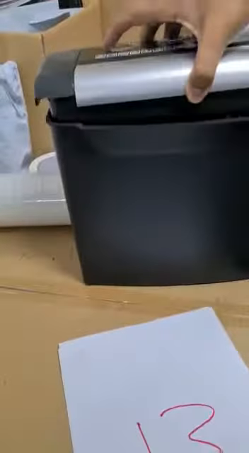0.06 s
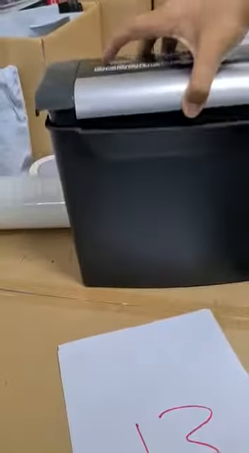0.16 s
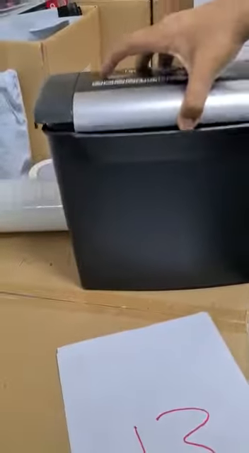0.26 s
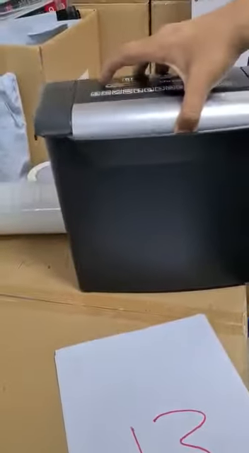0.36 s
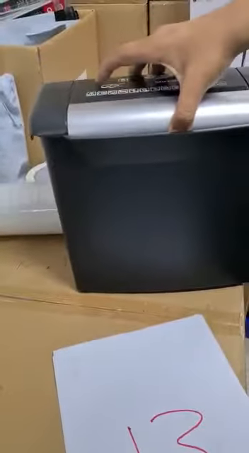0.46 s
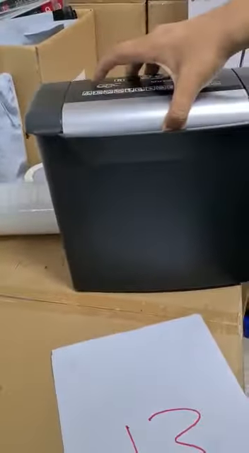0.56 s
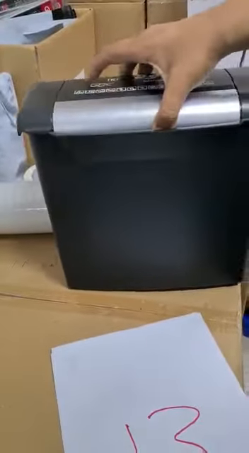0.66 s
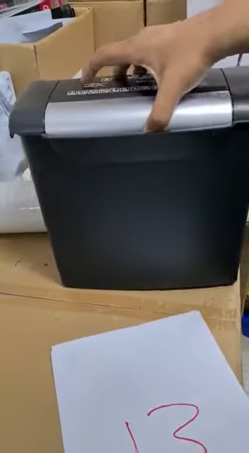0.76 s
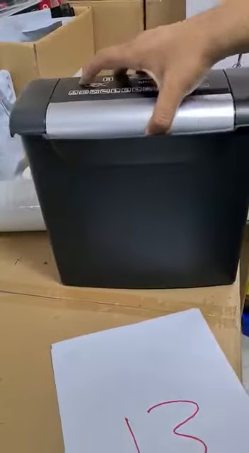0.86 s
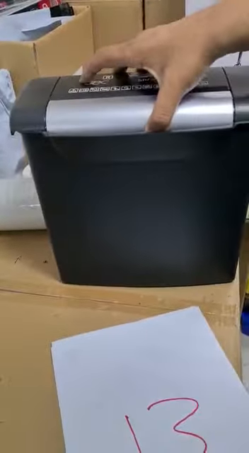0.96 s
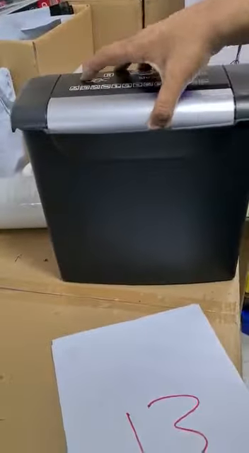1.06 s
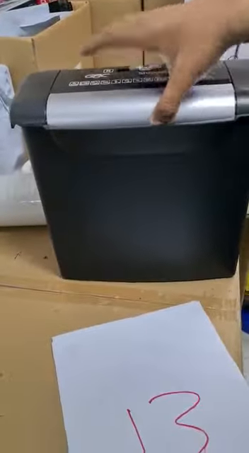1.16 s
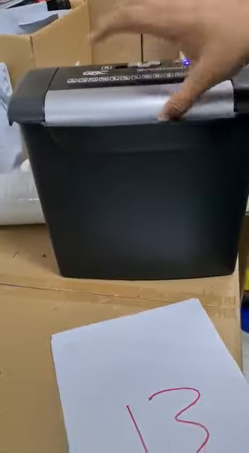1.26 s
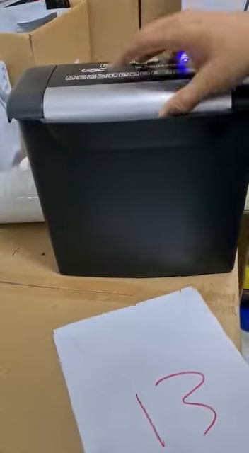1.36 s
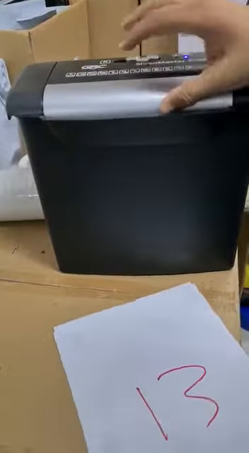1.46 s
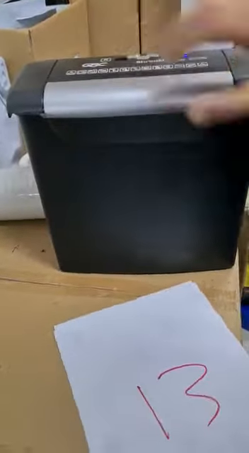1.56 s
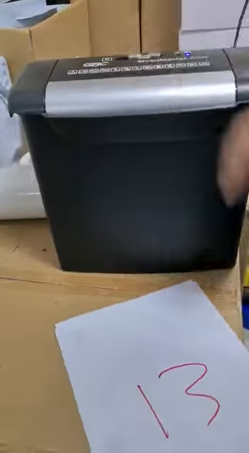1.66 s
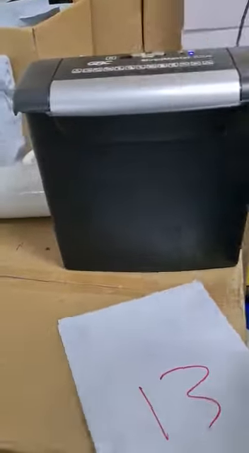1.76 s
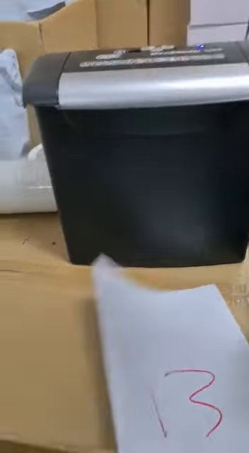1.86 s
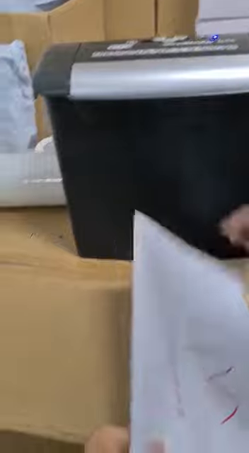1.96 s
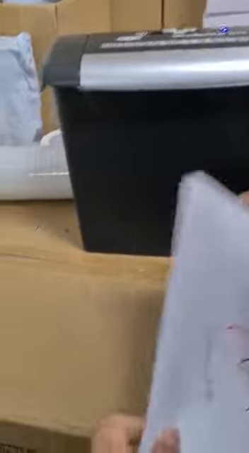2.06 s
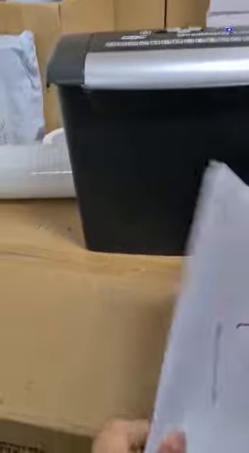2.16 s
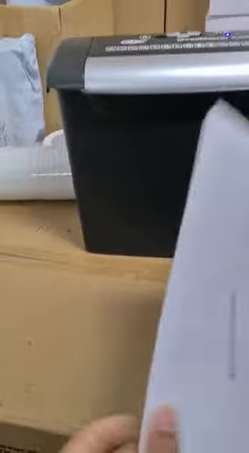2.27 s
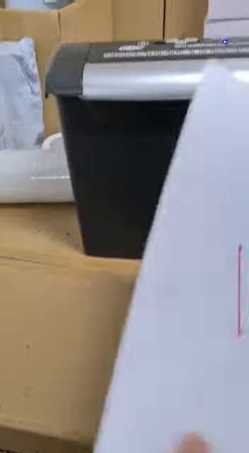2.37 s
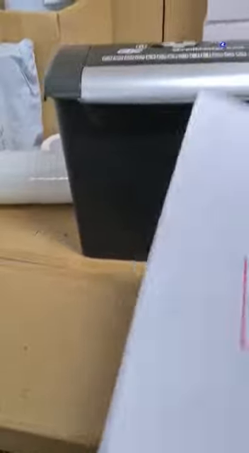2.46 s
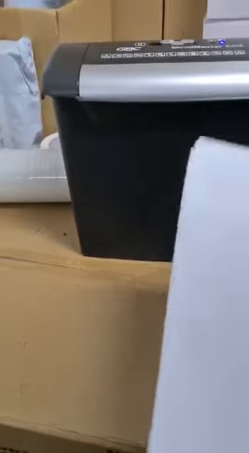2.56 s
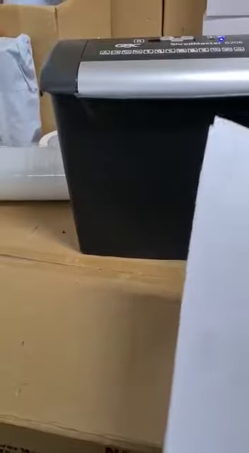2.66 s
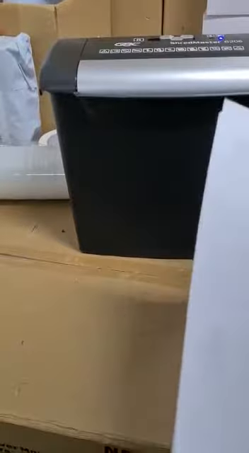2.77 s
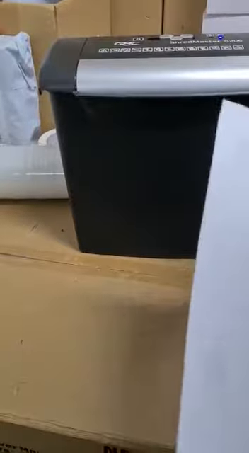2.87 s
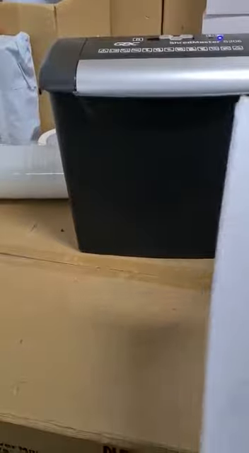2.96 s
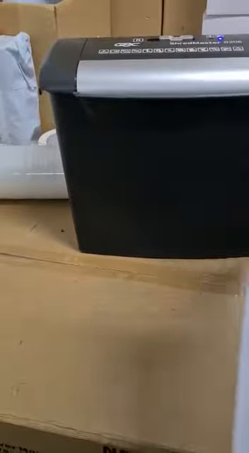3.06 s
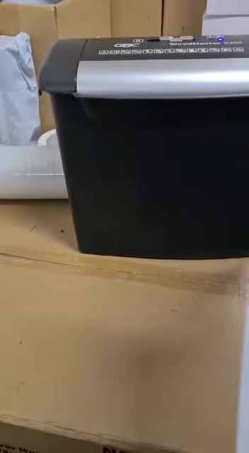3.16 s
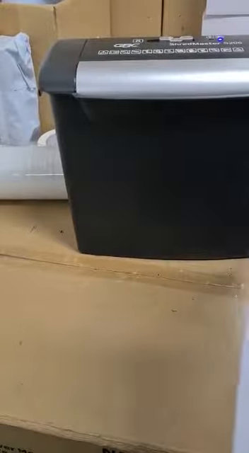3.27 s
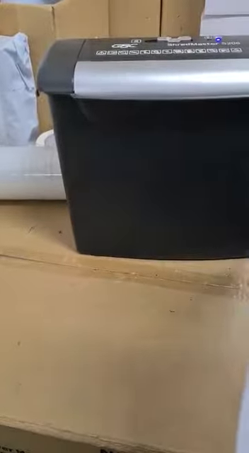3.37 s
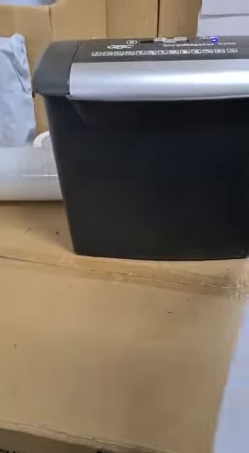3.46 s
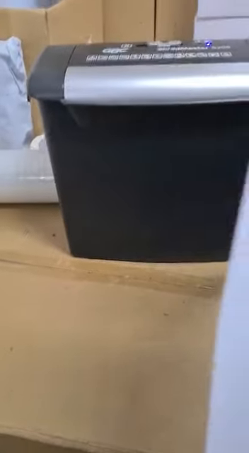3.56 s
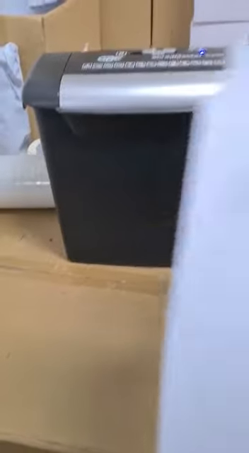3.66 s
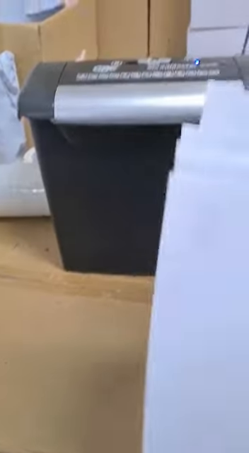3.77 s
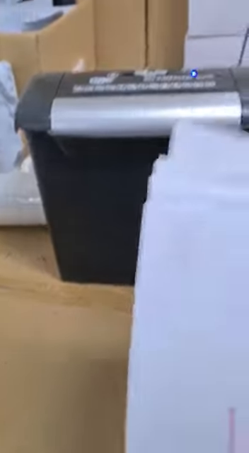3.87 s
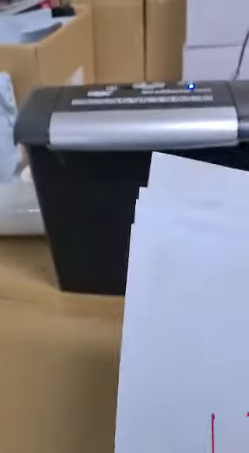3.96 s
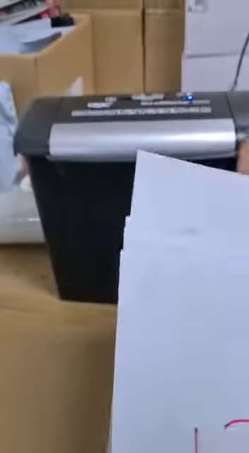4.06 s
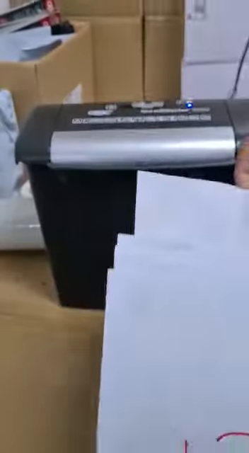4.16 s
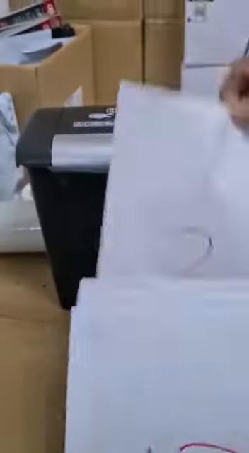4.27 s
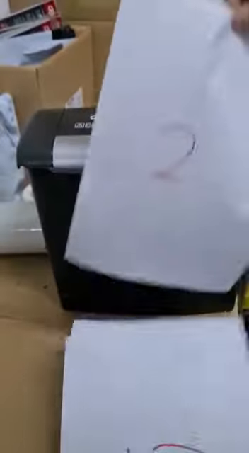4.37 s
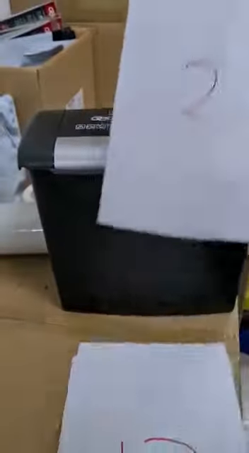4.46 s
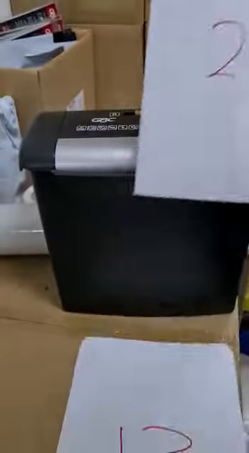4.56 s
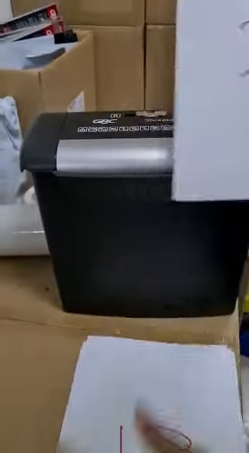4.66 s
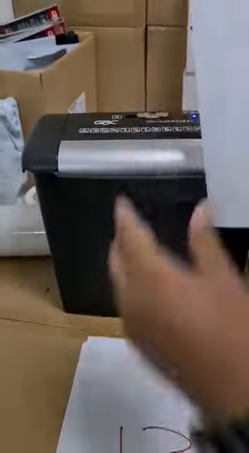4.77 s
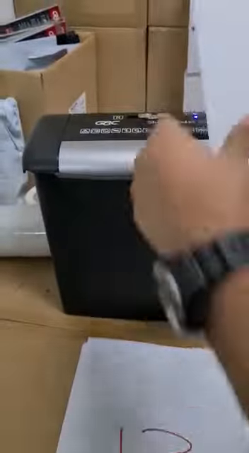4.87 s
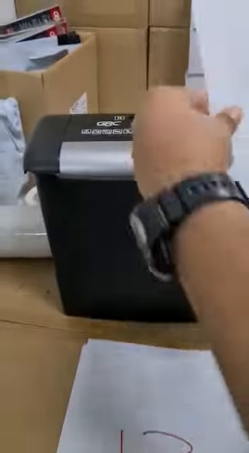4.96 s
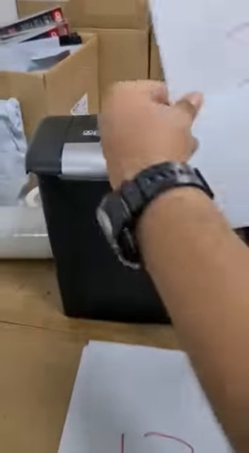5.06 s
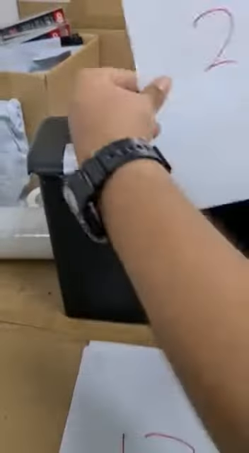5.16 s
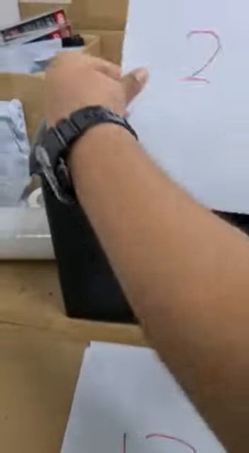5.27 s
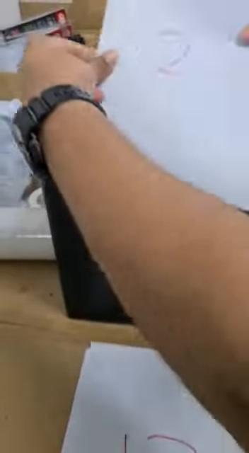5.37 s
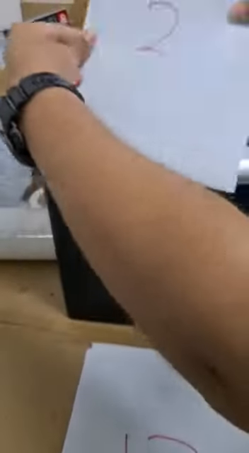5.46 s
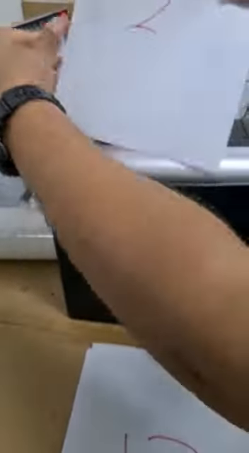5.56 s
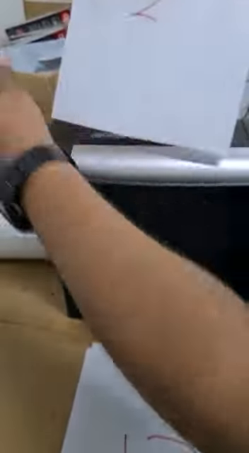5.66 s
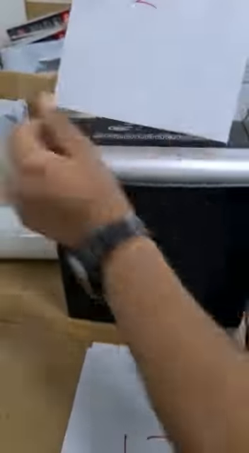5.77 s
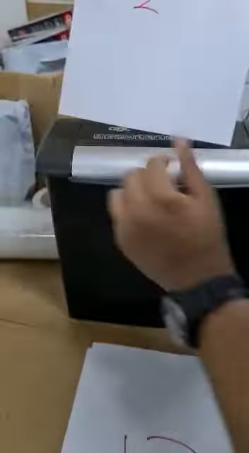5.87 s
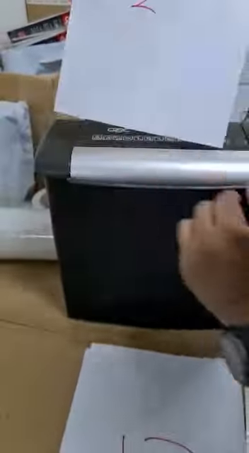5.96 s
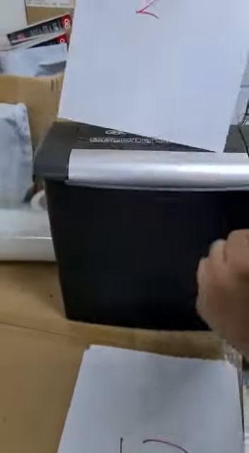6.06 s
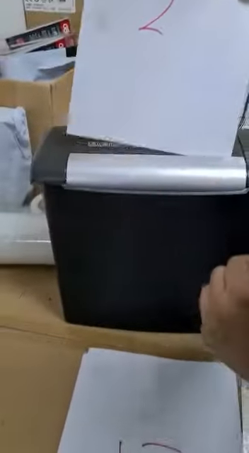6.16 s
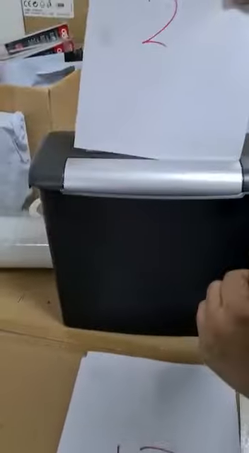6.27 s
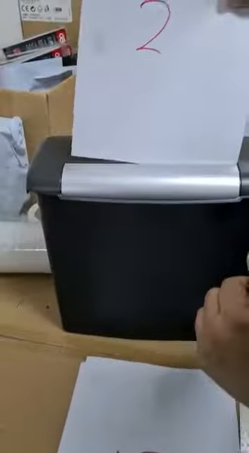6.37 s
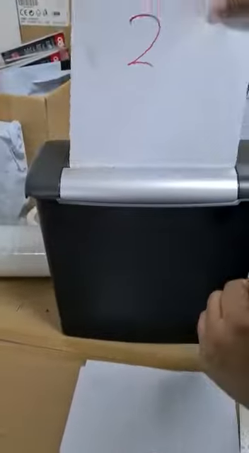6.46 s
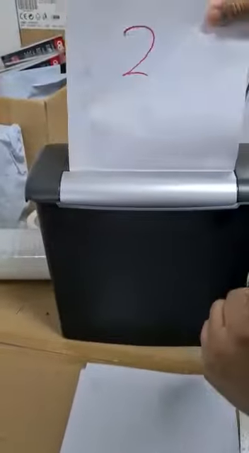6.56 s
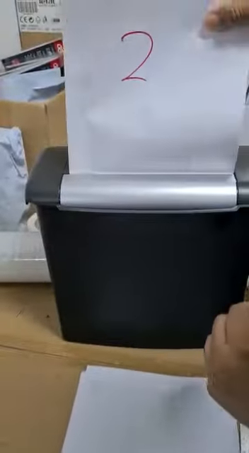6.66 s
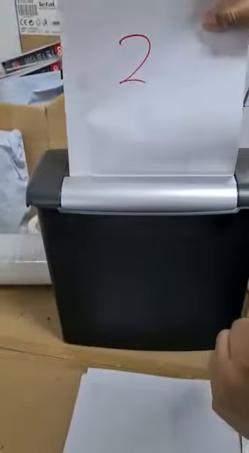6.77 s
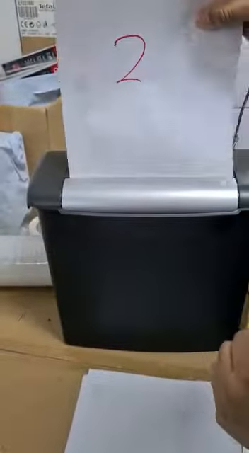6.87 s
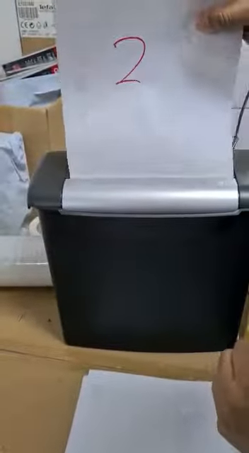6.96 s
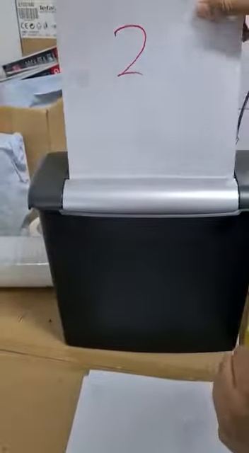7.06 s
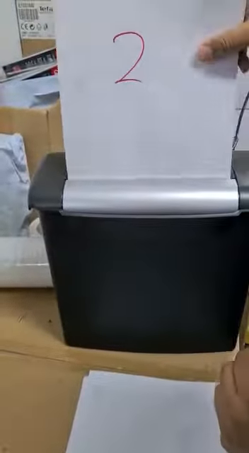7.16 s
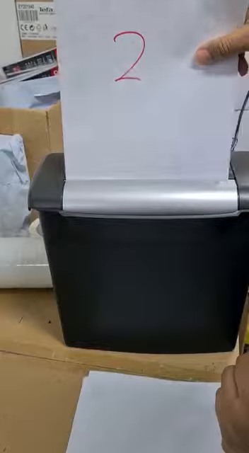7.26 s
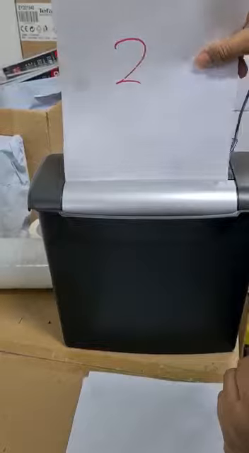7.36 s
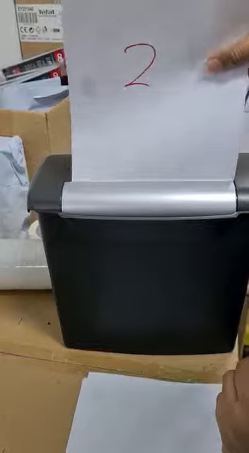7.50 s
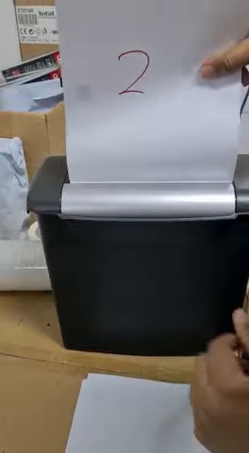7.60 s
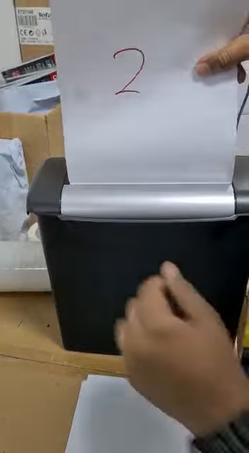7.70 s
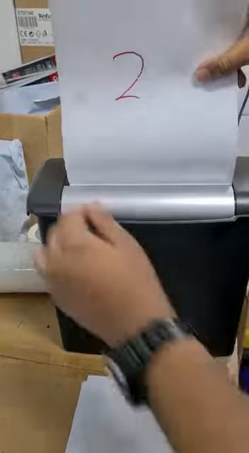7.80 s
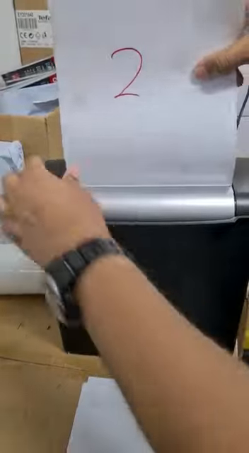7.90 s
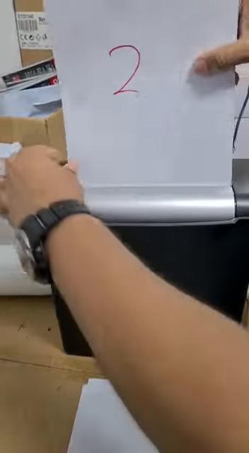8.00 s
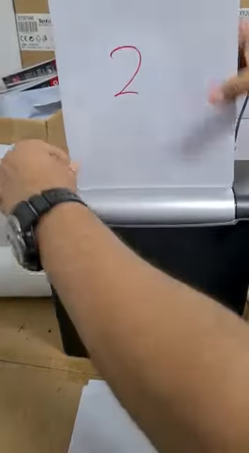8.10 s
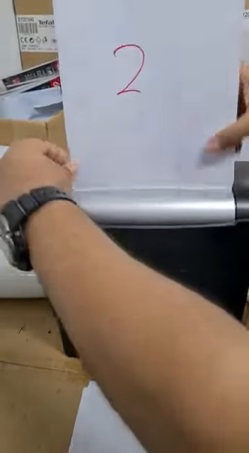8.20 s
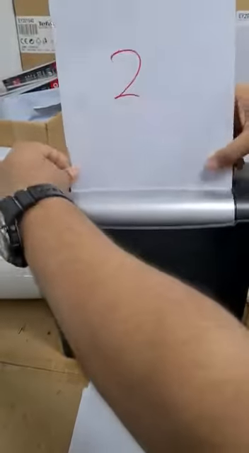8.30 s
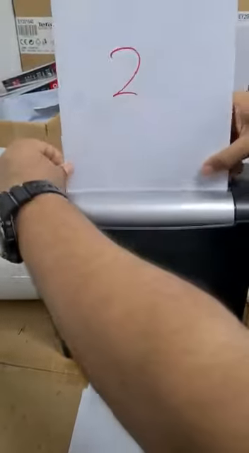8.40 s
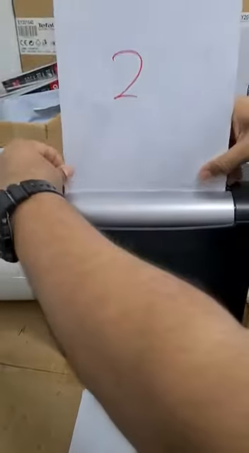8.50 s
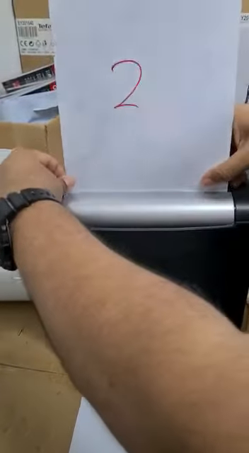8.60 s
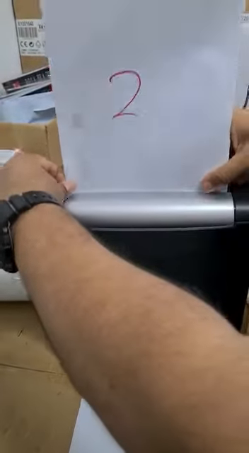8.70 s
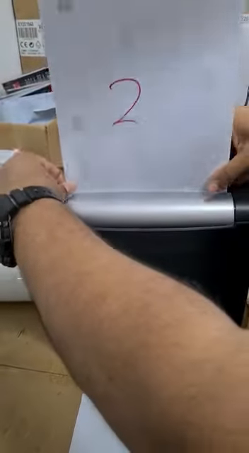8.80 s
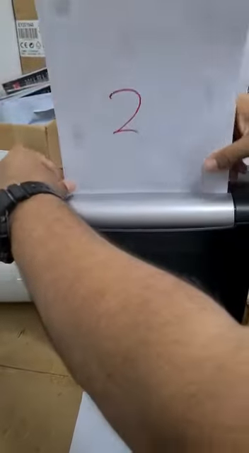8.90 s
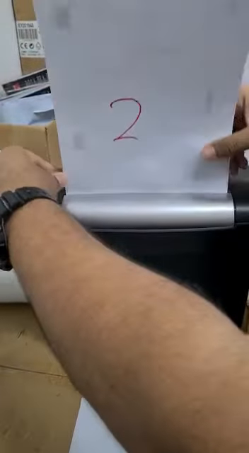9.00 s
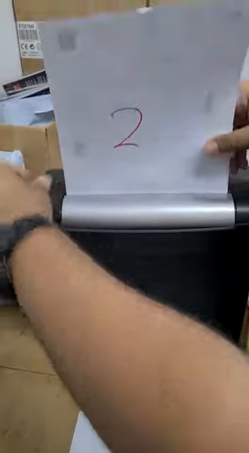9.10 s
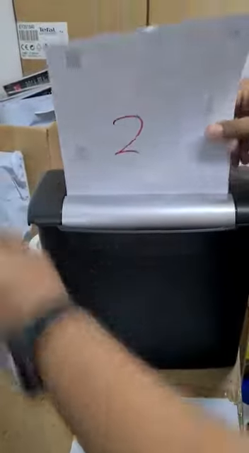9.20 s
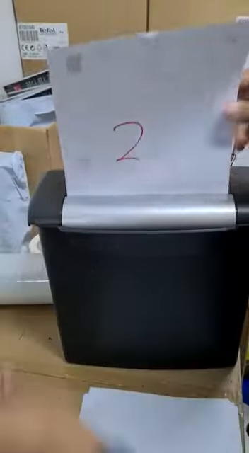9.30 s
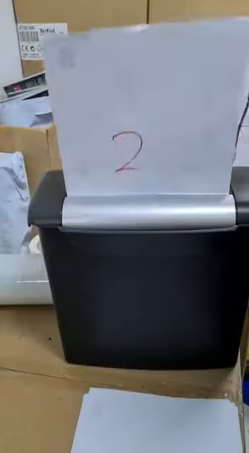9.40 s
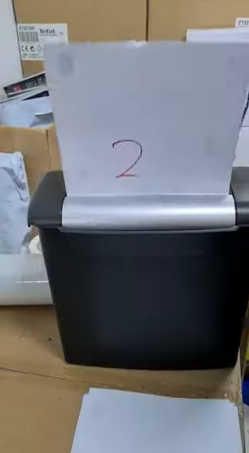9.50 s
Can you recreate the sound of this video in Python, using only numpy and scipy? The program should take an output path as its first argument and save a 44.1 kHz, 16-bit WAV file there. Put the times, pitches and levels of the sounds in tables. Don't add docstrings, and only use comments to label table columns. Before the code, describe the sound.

A plastic lid thumps onto a bin, paper slides and flaps, then a small shredder motor whines in short bursts before running on.

```python
import sys
import numpy as np
from scipy import signal
from scipy.fft import rfft, irfft, next_fast_len
from scipy.io import wavfile
from scipy.ndimage import uniform_filter1d

SR = 44100
rng = np.random.default_rng(int(sys.argv[2]) if len(sys.argv) > 2 else 0)


def to_wav(sig):
    pcm = np.clip(np.atleast_2d(sig), -1, 1) * 32767
    pcm = np.round(pcm).astype(np.int16)
    wavfile.write(sys.argv[1], SR, pcm.T)


def ratio(d):
    e = np.asarray(d, float) / 20
    return 10 ** e


N = 420713


def evened(x):
    return x / np.sqrt(np.mean(x ** 2) + 1e-20)


def read(points, hz):
    f, value = np.transpose(points)
    return np.interp(np.log(hz + 1), np.log(f + 1), value)


def wander(count, seconds, step=1 / SR, length=N):
    knots = rng.standard_normal((count, int(length * step / seconds) + 3))
    at = np.arange(length) * step / seconds
    return np.array([np.interp(at, np.arange(len(k)), k) for k in knots]) * 1.59


def coloured(x, db_at):
    size = next_fast_len(x.shape[-1])
    gain = ratio(db_at(np.fft.rfftfreq(size, 1 / SR)))
    return irfft(rfft(x, size) * gain, size)[..., :x.shape[-1]]


def hump(noise, hz, db_per_octave):
    return evened(coloured(noise, lambda f: -db_per_octave * abs(np.log2((f + 1) / hz))))


# freq_hz, likeness (1 = same, negative = opposed)
LIKENESS = [(60, 0.96), (180, 0.97), (550, 0.43), (1650, -0.28), (4970, 0.61), (15000, 0.2)]


def right_of(left, stranger, hz, least):
    same = np.clip(read(LIKENESS, hz), least, 1)[:, None]
    return same * left + np.sqrt(1 - same ** 2) * stranger


def patchy(noise, bins, frames):
    return evened(uniform_filter1d(uniform_filter1d(noise, bins, 0), frames, 1))


def hiss(points, patchy_db, grit_db, per_s):
    hz = np.fft.rfftfreq(512, 1 / SR)
    tick_db = grit_db * np.minimum(rng.exponential(1, N), 3.8)
    ticks = ratio(tick_db) * (rng.random(N) < per_s / SR)
    bed = np.sqrt(1 + evened(ticks) ** 2) * rng.standard_normal((2, N))
    z = signal.stft(bed, nperseg=512, noverlap=384)[2]
    z[1] = right_of(z[0], z[1], hz, least=.35)
    patches = patchy(rng.standard_normal(z.shape[1:]), 8, 16)
    z = z * ratio(read(points, hz)[:, None] + patchy_db * patches)
    return evened(signal.istft(z, nperseg=512, noverlap=384)[1][:, :N])


# freq_hz, t60_s
ROOM_DECAY = [(200, 0.3), (1000, 0.17), (4000, 0.04), (12000, 0.017)]


def placed(x, pan_db, lag_s, wet_db):
    taps = np.zeros((2, SR // 2))
    at = np.arange(40, SR // 2 - 20, 20) + rng.integers(0, 20, (2, (SR // 2 - 41) // 20))
    np.put_along_axis(taps, at, rng.choice([-1., 1.], at.shape), 1)
    hz, t, z = signal.stft(taps, SR, nperseg=256)
    z[1] = right_of(z[0], z[1], hz, least=0)
    t60 = read(ROOM_DECAY, hz)[:, None]
    tail = signal.istft(z * ratio(-60 * t / t60) / np.sqrt(t60), SR, nperseg=256)[1]
    tail *= ratio(wet_db) / np.linalg.norm(tail[0])
    tail[:, :32] += np.sinc(np.arange(32) - 12 - np.array([[-.5], [.5]]) * lag_s * SR)
    x = np.broadcast_to(x, (2, N)) * ratio(np.array([[.5], [-.5]]) * pan_db)
    return signal.fftconvolve(x, tail, axes=1)[:, 12:N + 12]


def strikes(rows, make, leaning=False):
    out, t = np.zeros((2, N + 12000)), np.arange(12000) / SR
    for row in rows:
        sound = make(t, rng.standard_normal(len(t)), *row[1:])
        at = round(row[0] * SR)
        level_db = row[1] + np.array([[.5], [-.5]]) * row[-1] * leaning
        out[:, at:at + len(t)] += ratio(level_db) * sound / abs(sound).max()
    return out[:, :N]


# freq_hz, level_db (per Hz)
RUMBLE = [(12, -60), (20, -16), (77, 1), (110, -14), (182, -9.5), (310, -19), (422, -22), (472, -22),
          (542, -24.5), (780, -20.5), (849, -22.5), (1370, -29), (1570, -26.5), (2020, -30), (16000, -83)]


def room_tone():
    level_db = -49.5
    hz = np.fft.rfftfreq(2048, 1 / SR)
    a, b, c, d, patches = rng.standard_normal((N // 512 + 5, 1025, 5)).T
    left = a + 1j * b
    z = np.array([left, right_of(left, c + 1j * d, hz, least=-1)])
    z *= ratio(read(RUMBLE, hz)[:, None] + 1.23 * patchy(patches, 10, 6))
    rumble = evened(signal.istft(z, nperseg=2048, noverlap=1536)[1][:, :N])
    return ratio(level_db + np.array([[-.8], [.8]])) * rumble


# start_s, peak_db, ring_hz, t60_s
THUMPS = [(0.0, -24, 193, .05), (0.014, -23, 192, .22), (0.165, -36, 266, 0.051), (0.275, -38, 144, .05),
          (0.334, -30, 228, .035), (0.352, -47, 246, .04), (0.445, -37, 165, 0.055),
          (0.749, -37, 203, 0.074), (1.188, -28.5, 163, 0.052), (1.442, -39.5, 176, 0.051),
          (1.476, -39.5, 284, 0.055), (2.135, -37, 105, .06), (2.184, -31.5, 280, 0.037),
          (2.411, -36.5, 129, 0.046), (2.474, -28, 302, 0.043), (4.412, -36, 195, 0.036),
          (5.353, -35, 142, 0.054), (6.494, -28, 110, 0.038), (6.505, -27, 202, 0.15),
          (7.579, -23.5, 206, .08), (8.307, -23, 164, 0.055), (8.494, -27.5, 217, 0.08)]


def thump(t, noise, db, hz, t60):
    ring = np.sin(2 * np.pi * hz * t) + 0.13 * np.sin(2 * np.pi * 0.93 * hz * t + noise[0])
    push = 0.22 * hump(noise, hz, 9.8)
    return (ring + push) * ratio(-60 * t / max(t60, .02)) * np.minimum(t / 0.0022, 1)


# start_s, peak_db,
# centre_hz, top_db (top end over hump)
MORE_SNAPS = [
    (0.0, -42, 3000, 3),
    (2.4753, -36, 3050, -15),
    (7.5782, -20, 4250, -22),
    (8.5034, -35.5, 4250, -20),
    (4.1237, -35, 4500, -4),
    (4.9408, -37, 4000, -12),
    (5.3593, -36, 4500, -6),
         (0.015, -32, 2050, -27), (1.7843, -29.5, 6200, -3), (2.14, -33.5, 4360, -18),
           (2.1654, -33, 3000, -18), (4.0573, -36.5, 2400, -14), (4.0932, -36, 5500, -7),
           (4.2345, -40, 4200, -20), (4.2693, -32, 1800, -19), (4.3483, -32, 2500, -22),
           (4.3726, -28, 2180, -27), (4.417, -34, 1500, -18), (4.4404, -37, 1730, -19),
           (4.469, -23, 1680, -30), (5.004, -31, 3500, -33), (5.3166, -32, 2040, -28),
           (5.3648, -31, 2500, -25), (5.4088, -33.5, 5500, -6)]
# start_s, peak_db, centre_hz, top_db
SNAPS = [(0.124, -55, 5500, -40), (0.148, -36.5, 4500, -48), (1.6599, -36, 2030, -4),
         (1.7791, -26.5, 1990, -8), (2.139, -39, 1900, -31), (2.1655, -36, 1840, -18),
         (2.4124, -38, 5980, 11), (2.4754, -28.5, 2330, -26), (2.612, -39.5, 3600, -38),
         (3.1726, -49, 2710, -9), (3.1971, -42, 2930, -7), (3.8217, -38, 4070, -44),
         (4.123, -28.5, 1880, -2), (4.213, -25, 1900, -33), (4.301, -23.5, 1690, -15),
         (4.424, -36, 1800, -26), (4.4548, -23.5, 1800, -48), (4.494, -23, 2410, -41),
         (4.9414, -32, 3370, -30), (4.9662, -23.5, 1770, -50), (5.235, -36, 2950, -5),
         (5.3576, -30, 1930, -4), (5.4447, -36, 1850, -12), (5.5094, -37.5, 2960, -28)]
# start_s, peak_db, centre_hz, top_db
CLICKS = [
    (6.435, -32, 4100, -11),
    (6.546, -26.5, 1870, -28),
    (7.217, -22.5, 1520, -26),
    (7.28, -19, 2340, -5),
    (7.4137, -21, 1880, 2),
    (7.579, -16, 2150, -50),
    (8.504, -44, 2000, -21),
]


def snap(t, noise, db, hz, top_db):
    top = evened(coloured(noise, lambda f: np.clip(20 * np.log2((f + 1) / 7000), -60, 0)))
    crack = hump(noise, hz, 22.3) + ratio(top_db + 1.5) * top
    t60_s = .017
    return crack * ratio(-60 * t / t60_s) * np.minimum(t / 0.00052, 1)


# start_s, peak_db, centre_hz, lean_db (left over right)
BUCKLES = [(0.011, -29.5, 432, -5), (2.138, -37, 660, -3), (2.185, -34, 720, 0), (2.411, -42, 600, 4),
           (2.473, -27, 640, 5), (2.489, -28, 510, -1), (4.122, -34.5, 606, 3), (4.139, -33.5, 1180, 3),
           (4.196, -26, 524, 1), (4.269, -33, 511, 5), (4.303, -28, 593, 1), (4.329, -29.5, 720, 2),
           (4.369, -26, 1150, 5), (2.073, -35, 600, 0), (4.413, -33, 900, 0), (2.466, -35, 700, 0),
           (4.454, -27.5, 1560, -6), (4.474, -34, 383, -1), (4.961, -28.5, 1640, 13.5),
           (5.009, -33, 1140, 16), (5.359, -32.5, 1010, 12), (5.444, -32.5, 990, 9)]


def buckle(t, noise, db, hz, pan_db):
    lumps = ratio(3.75 * wander(1, .004, length=len(t))[0])
    t60_s = .11
    return hump(noise, hz, 11.5) * lumps * ratio(-60 * t / t60_s) * np.minimum(t / 0.0014, 1)


# start_s, peak_db, ring_hz, lean_db (left over right)
KNOCKS = [(0.751, -40, 600, -1.5), (1.342, -43, 710, -3), (2.075, -36.5, 1150, 3), (2.139, -31.5, 676, -5),
          (2.141, -35.5, 1240, 4), (0.334, -45, 650, -3), (8.338, -27.5, 803, -3), (2.185, -29, 740, 3),
          (2.474, -29, 624, 2), (5.36, -30.5, 1050, 10), (6.246, -35.5, 713, 8), (6.517, -24, 669, 1),
          (7.218, -32, 660, 2), (7.382, -25.5, 713, 5), (8.327, -24, 686, 1), (8.503, -21.5, 687, 3)]


def knock(t, noise, db, hz, pan_db):
    ring = np.sin(2 * np.pi * hz * t) + 0.16 * np.sin(2 * np.pi * 0.96 * hz * t + noise[0])
    puff = 0.45 * hump(noise, hz, 10.7)
    t60_s = np.clip(.045 + .008 * (db + 29), .028, .1)
    return (ring + puff) * ratio(-60 * t / t60_s) * np.minimum(t / .004, 1)


def strokes(rows, rise_db_per_s, fall_db_per_s, linger_db, rest_db):
    t = np.arange(0, N / SR, 1 / 500)
    start, length, db, change_db = np.transpose(rows)[:, :, None]
    db = db + change_db * np.clip((t - start) / length, 0, 1)
    db = db - rise_db_per_s * np.maximum(start - t, 0)
    db = db - fall_db_per_s * np.maximum(t - start - length, 0)
    gain = ratio(db.max(0))
    settle = signal.lfilter([.03], [1, -.97], gain)
    return np.interp(np.arange(N) / SR, t, gain + ratio(linger_db) * settle + ratio(rest_db))


# start_s, length_s, hiss_db, change_db (over the stroke)
STROKES = [(.56, 0.1, -95, 30), (.705, 0.046, -63.5, -9), (1.275, 0.38, -61.5, -24),
           (1.655, 0.076, -53, -23), (1.778, 0.03, -46, -24), (1.82, 0.15, -64.5, -4), (2.04, .08, -74, -7),
           (2.135, 0.034, -55.5, 0), (2.2, 0.055, -58, 6.5), (2.415, 0.18, -57, -8.5),
           (2.62, 0.17, -73.5, 8), (2.88, 0.1, -58, 2), (3.0, 0.064, -49.5, -14), (3.285, 0.36, -51, -19),
           (3.63, .13, -59, -1), (3.82, 0.06, -62, 0), (3.97, 0.1, -51.5, -2), (4.125, 0.031, -41.5, -17),
           (4.19, 0.16, -58, 10), (4.42, 0.17, -54, -2), (4.57, 0.11, -61, -16), (4.935, 0.072, -61.5, 3),
           (5.12, 0.15, -71.5, 14.5), (5.25, 0.069, -61, 4), (5.355, 0.13, -54.5, -5.5),
           (6.125, 0.11, -71.5, 14.5), (6.36, 0.095, -72, 12), (6.44, 0.057, -51.5, -12)]
# freq_hz, level_db (per Hz)
SLIDE = [(1180, -20), (2000, 1.5), (2440, -12), (2640, -5.5), (3610, 2), (4300, 2.5), (4860, 1),
         (6700, -5.5), (11300, -3), (16000, -14.5)]
# start_s, length_s, rattle_db, change_db (over the shake)
SHAKES = [
    (.6, 0.13, -69, 6.5),
    (4.0, 0.071, -66, 14),
    (4.1, 0.18, -51, 2),
    (4.3, 0.2, -47, 4),
    (4.968, 0.23, -40.5, -30),
    (5.25, 0.12, -56, 19.5),
    (5.39, 0.11, -49, 5.5),
]
# freq_hz, level_db (per Hz)
FLAP = [(88, -38), (150, -7), (270, -3.5), (422, -11), (681, -1), (858, -19), (1030, -1), (1190, -8.5),
        (1910, -8), (6000, -33), (7800, -61), (13200, -120)]


def paper():
    slide = strokes(STROKES, 1040, 560, linger_db=-17.5, rest_db=-82.5)
    slide = slide * hiss(SLIDE, 3.0, grit_db=4.0, per_s=1200)
    flap = strokes(SHAKES, 450, 360, linger_db=-31, rest_db=-110)
    flap = flap * ratio(1.0 + 2.3 * wander(1, .008)[0])
    return slide + flap * hiss(FLAP, 2.15, grit_db=3.0, per_s=420)


# on_s, off_s, aim_turns_per_s, time_constant_s
POWER = [
    (6.49, 7.028, 228.8, .132),
    (7.132, 7.271, 212.7, .073),
    (7.388, 7.994, 233, .123),
    (8.323, 8.427, 170.5, .072),
    (8.501, 8.774, 257.6, .242),
    (8.774, 9.0, 217, .05),
    (9.0, 9.25, 217.5, .1),
    (9.25, 9.6, 232, .5),
]


def shaft(t):
    coast_to, coast_s = 77.7, .169
    speed, stage, live = np.zeros(len(t)), np.zeros(len(t), int), np.zeros(len(t))
    now = coast_to
    next_on = [row[0] for row in POWER[1:]] + [N / SR]
    for k, ((on, off, aim, lag), until) in enumerate(zip(POWER, next_on)):
        speed = np.where(t >= on, aim + (now - aim) * np.exp(-(t - on) / lag), speed)
        now = aim + (now - aim) * np.exp(-(off - on) / lag)
        speed = np.where(t >= off, coast_to + (now - coast_to) * np.exp(-(t - off) / coast_s), speed)
        now = coast_to + (now - coast_to) * np.exp(-max(until - off, 0) / coast_s)
        stage[t >= on] = k
        live[(t >= on - .012) & (t < off)] = 1
    return speed, stage, live


# freq_hz, width_hz, boost_db
HOUSING = [(705, 82, 11.5), (821, 100, 8.5), (1150, 220, 12), (1800, 520, 4), (2400, 700, 9),
           (3000, 450, 17), (3880, 220, 10), (4520, 190, 5.5), (4330, 1200, 3.5)]


def housing_db(hz):
    return sum(db / (1 + (2 * (hz - f) / width) ** 2) for f, width, db in HOUSING)


def swell_db(speed, at, width, db):
    return db / (1 + (2 * (speed - at) / width) ** 2)


PINION_DB = [-13, -3, 4, -13, -7, -5, 1.5, -11, -7, -6, -8, -15, -15, -13, -15, -14, -12, -15, -7, -16]
GEAR_STEPS = np.array([16, 24, 32, 48, 73]) / 7
GEAR_DB = [-12, 3.5, -1, -6, -6]


def gear_whine(speed, live, turns, load_db):
    count = len(speed)
    shake_db = load_db[2] + swell_db(speed, 198, 36, 9.8)
    pinion_db = load_db[3] + swell_db(speed, 201.5, 39.0, 11.64)
    gear_db = load_db[4] - swell_db(speed, 210.8, 26.3, 11.1)
    orders = np.r_[np.arange(2, 2 + len(PINION_DB)), GEAR_STEPS][:, None]
    fourth_db = housing_db(4 * speed)
    levels_db = np.r_[np.c_[PINION_DB] + pinion_db, np.c_[GEAR_DB] + gear_db + fourth_db - 6.5]
    levels_db += housing_db(orders * speed) - fourth_db
    levels_db += -1.8 + 2.2 * wander(len(orders), .03, length=count)
    levels_db -= .17 * np.maximum(185 - speed, 0) + 4 * (1 - live)
    phases = 2 * np.pi * (orders * turns + rng.random(orders.shape))
    whine = (ratio(levels_db) * np.cos(phases)).sum(0)
    shake_db = shake_db - 1.5 + 2.33 * wander(1, .02, length=count)[0]
    return whine + ratio(shake_db) * np.cos(2 * np.pi * turns)


# freq_hz, level_db
HUM = [(100, -53), (150, -51.5), (305, -51.5)]
# multiple (of shaft speed), level_db
IDLER = [(8 / 7, -11), (27 / 7, -16)]


def buzzing(t, turns, grind_db):
    buzz = sum(ratio(db + 32.0 + grind_db) * np.cos(2 * np.pi * hz * t) for hz, db in HUM)
    for k, db in IDLER:
        tone_db = db + grind_db + 1.84 * wander(1, 0.065, length=len(t))[0]
        buzz += ratio(tone_db) * np.cos(2 * np.pi * k * turns)
    return buzz


# freq_hz, level_db (per Hz)
GRIND = [(40, -19), (90, -23), (200, 2), (330, -4.5), (500, -10.5), (800, -11), (1050, -13), (1800, -8),
         (2600, -12), (3600, -15.5), (4600, -15), (5600, -26.5), (8000, -30)]
# freq_hz, level_db (per Hz)
CUTTER = [(2650, -20), (4500, -18.5), (5360, -10.5), (7140, -8), (8780, -6), (13100, -11.5), (15200, -15),
          (16000, -24)]
# count_per_turn, level_db (under grind), blur_rad
WHISTLES = [(60, -23, .9), (72, -27, 1.2)]


def grinding(start, live, turns, load_db, grind_db, hiss_db):
    count = len(turns)
    throb = 1 + 0.16 * np.cos(2 * np.pi * turns / 2)
    grind = hiss(GRIND, 1.6, grit_db=3.0, per_s=2500)
    grind = evened(coloured(grind, lambda hz: .3 * housing_db(hz)))[:, start:]
    cutter = hiss(CUTTER, 1.0, grit_db=-1.0, per_s=4000)[:, start:]
    brush = 0
    for k, db, blur in WHISTLES:
        brush += ratio(db) * np.cos(2 * np.pi * k * turns + blur * wander(1, 0.0028, length=count)[0])
    loose = uniform_filter1d(1 - live, size=2000) * hump(rng.standard_normal(count), 830, 20.0)
    noise = ratio(grind_db - 1.0) * throb * grind + ratio(hiss_db + 0.76) * cutter
    noise += ratio(grind_db + 2.0 * wander(1, 0.054, length=count)[0]) * brush
    noise += ratio(load_db[0] - 6 + 1.8 * wander(1, 0.014, length=count)[0]) * loose
    return noise


# grind_db, cutter_hiss_db, unbalance_db, pinion_db, second_gear_db
LOAD = [
    (-32.5, -45.5, -44, -49.5, -50.5),
    (-30, -44, -48.5, -49.5, -45),
    (-34, -46.5, -46.5, -48.5, -47),
    (-36, -48, -56, -53.5, -55),
    (-32, -42.5, -39, -54.5, -46.5),
    (-32, -43.5, -41, -52, -36),
    (-31.5, -41.5, -39, -49.5, -35.5),
    (-31.5, -42.5, -42, -51, -39.5),
]


def motor():
    start = round(POWER[0][0] * SR)
    t = np.arange(start, N) / SR
    speed, stage, live = shaft(t)
    slack_db = (1 - live) * 1.2 + np.where(live, .2, .6) * np.maximum(128 - speed, 0)
    load_db = uniform_filter1d(np.transpose(LOAD)[:, stage] - slack_db, size=700)
    octaves = np.log2(speed / 220)
    grind_db = load_db[0] + 7 * octaves
    hiss_db = load_db[1] + 9.5 * octaves + uniform_filter1d(slack_db * (1 - live), size=700) / 2
    jitter = 1 + .0018 * wander(1, .015, length=len(t))[0]
    turns = np.cumsum(speed * jitter) / SR
    tones = gear_whine(speed, live, turns, load_db) + buzzing(t, turns, grind_db)
    noise = grinding(start, live, turns, load_db, grind_db, hiss_db)
    rise = np.minimum((t - t[0]) / 0.0051, 1)
    return np.pad(np.sqrt(2) * tones * rise, (start, 0)), np.pad(noise * rise, ((0, 0), (start, 0)))


def scene():
    air = room_tone()
    hits = strikes(THUMPS, thump) + strikes(KNOCKS, knock, True) + strikes(BUCKLES, buckle, True)
    hits += strikes(SNAPS + CLICKS + MORE_SNAPS, snap)
    hits = placed(hits, pan_db=-1.9, lag_s=.00012, wet_db=-6)
    sheets = placed(paper(), pan_db=-2.0, lag_s=-0.00014, wet_db=-3.5)
    whine, grind = motor()
    machine = placed(whine, pan_db=-2.5, lag_s=0.00013, wet_db=-7)
    machine += placed(grind, pan_db=-0.5, lag_s=0.00016, wet_db=-13)
    return machine + air + sheets + hits


def band_limit(x):
    return signal.sosfilt(signal.butter(12, 16480, fs=SR, output="sos"), x)


def record(dry):
    heard = coloured(dry, lambda f: -6.5 / (1 + ((f - 7150) / 350) ** 2))
    edge = signal.firwin(255, 15900, window=("kaiser", 9), fs=SR)
    mix = signal.oaconvolve(heard, edge[None], "same")
    return band_limit(mix)


dry = scene()
out = record(dry)
to_wav(out)
```